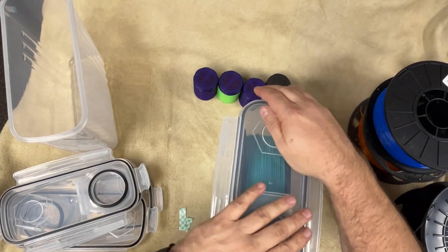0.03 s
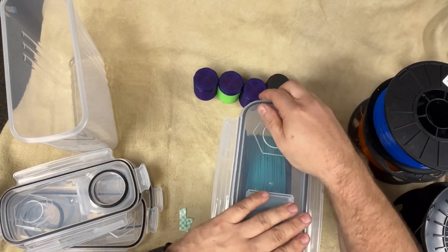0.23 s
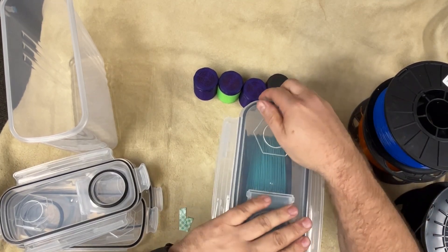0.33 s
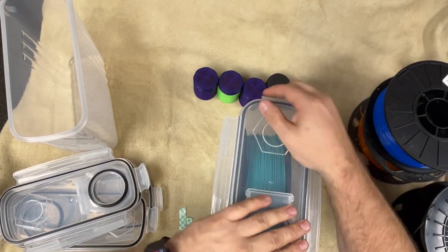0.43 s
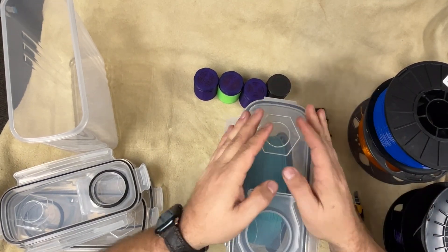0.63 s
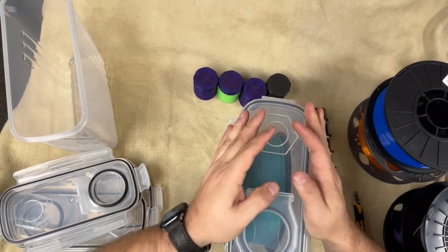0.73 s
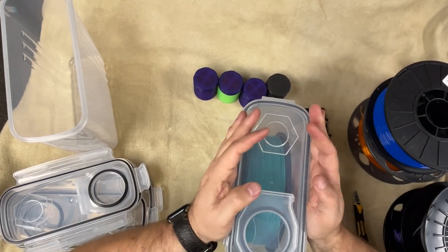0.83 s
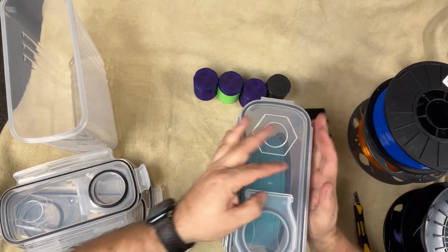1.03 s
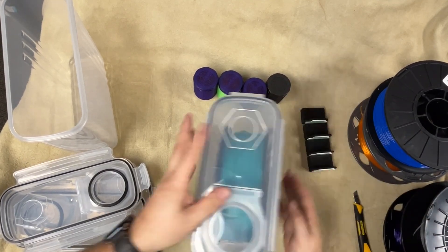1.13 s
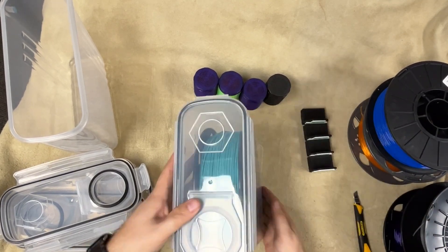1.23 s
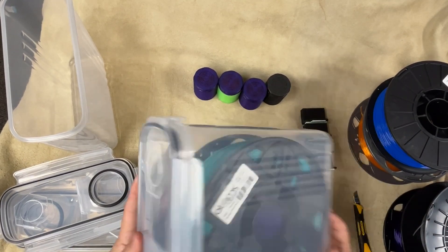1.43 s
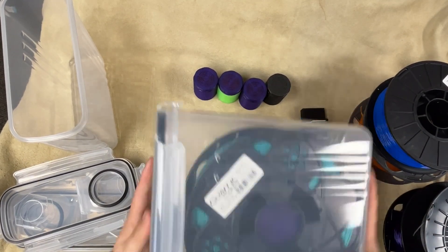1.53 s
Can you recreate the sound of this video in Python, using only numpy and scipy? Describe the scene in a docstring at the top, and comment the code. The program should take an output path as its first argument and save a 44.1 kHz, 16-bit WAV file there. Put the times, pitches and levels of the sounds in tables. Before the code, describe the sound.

Latches on a hollow plastic box snap shut: one loud crack early, a quick double clack midway, then softer knocks, with light handling ticks and brushing hands, close stereo microphone in a small quiet room.

```python
"""On a cloth-covered table, close under a stereo microphone, hands press the latch flaps of a plastic box shut.
Each snap is a short rattling push that sets the hollow box, its lid, the flap and its thin edge ringing.
Small handling ticks ring the same parts; a few squeaks are gliding tones, and the brushing hands are noise.
Wavering hum tones and airy room noise run throughout, and the snaps and ticks leave a short room echo."""
import sys
import numpy as np
from scipy import signal
from scipy.fft import rfft, irfft, next_fast_len
from scipy.io import wavfile
from scipy.ndimage import uniform_filter1d

SR = 44100
rng = np.random.default_rng(int(sys.argv[2]) if len(sys.argv) > 2 else 0)


def dump_mix(stems):
    """Bounce the given channels to the path in sys.argv[1] as a 16-bit WAV at rate SR."""
    frames = np.atleast_2d(stems).T  # one column per channel
    limited = np.clip(frames, -1, 1)  # hard clip at full scale
    pcm = np.round(limited * 32767).astype(np.int16)
    wavfile.write(sys.argv[1], SR, pcm)


N = 70560   # samples, 1.6 s

# background noise of the room, relative: pitch_hz, level_db per Hz
AIR_COLOUR = [(18, -84), (30, -66), (75, -7.5), (149, -10.5), (184, -19.5), (336, -12.5), (384, -15),
              (600, -13.5), (1220, -28), (1460, -25), (1630, -25.5), (2610, -31.5), (2980, -31),
              (12000, -51.5), (16000, -65)]
# tones of the hum: pitch_hz, level_db (rms, around which it wavers)
HUM_TONES = [(88, -56), (180, -59.5), (395, -60.5), (510, -64.5)]
# how loud the hands brush plastic and cloth: time_s, level_db
RUSTLE_LEVELS = [(0, -67.5), (.07, -55), (.13, -66), (.165, -66.5), (0.211, -52), (.4, -71), (.47, -57.5),
                 (.54, -71), (.6, -58.5), (.66, -67.5), (.76, -61.5), (.93, -60.5), (1.031, -50),
                 (1.08, -64), (1.16, -60.5), (1.35, -68), (1.48, -62.5), (1.6, -58)]
# colour of that brushing, relative: pitch_hz, level_db per Hz
RUSTLE_COLOUR = [(300, 13), (1000, 15), (3000, 1), (6000, 4), (8500, -17), (11000, -11), (14000, -8)]
# how alike both sides of the noise are: pitch_hz, likeness (0 to 1)
LIKENESS = [(60, 0.93), (350, 0.99), (690, 0.54), (1030, 0.043), (3000, 0.18), (6000, 1), (8500, 1),
            (15000, 1)]
# latch snaps and knocks: start_s, thump_db, thump_centre_hz, lid_db, lid_centre_hz,
# crack_db, crack_centre_hz, treble_db
SNAPS = [(0.2354, -22, 310, -8.5, 860, -10, 4504, -23.5),
         (0.2388, -11.5, 272.4, -16.5, 640, -17, 4930, -55), (0.2452, -7, 55, -22, 640, -53, 2170, -57),
         (.800, -37, 265, -35.5, 783, -45, 2700, -79), (0.807, -30, 288, -37, 783, -25, 3260, -54.5),
         (0.8077, -15, 260, -14, 479, -35, 2950, -51), (0.822, -18, 274, -14, 1400, -17, 4290, -32.5),
         (0.8457, -35, 259, -12.5, 1300, -12.5, 2237, -18.5),
         (0.8495, -36.5, 256, -24.5, 666, -24.5, 2410, -40),
         (0.8555, -34, 256, -38.5, 926, -24.5, 2800, -31.5),
         (1.2221, -28.5, 253, -34.5, 506, -64, 1950, -74), (1.2394, -14.5, 310, -17.5, 663, -32, 3100, -49),
         (1.2605, -40.5, 320, -36.5, 684, -44, 2930, -63), (1.5276, -23.5, 140, -30, 780, -33, 2260, -56),
         (1.571, -33, 340, -42.5, 505, -71, 2000, -87.5), (1.593, -28, 183, -42.5, 634, -45.5, 1530, -64)]
# small ticks of handling: same columns as the snaps
TICKS = [(0.051, -42, 282, -37.5, 635, -39, 1870, -65.5), (0.1728, -35, 310, -39.5, 790, -32.5, 2090, -82),
         (0.1915, -34, 305, -34, 650, -40, 2840, -83), (.439, -37.5, 303, -41.5, 600, -45, 2040, -75),
         (0.467, -49, 265, -48.5, 595, -50.5, 3100, -67), (.563, -80, 270, -71, 606, -48, 6750, -53),
         (0.587, -35, 330, -46, 604, -45, 1900, -58), (0.748, -45.5, 270, -72, 620, -41.5, 3240, -89),
         (.759, -39.5, 277, -48, 585, -52, 2220, -86), (0.783, -59, 276, -38, 790, -49.5, 1600, -81),
         (0.994, -37.5, 301, -44.5, 780, -51, 1510, -72), (1.042, -36, 230, -50, 600, -34, 2100, -77),
         (1.45, -46, 270, -71, 600, -44.5, 2140, -68), (1.477, -42, 200, -46.5, 704, -50.5, 1490, -81),
         (1.507, -36, 202, -56, 597, -48, 2830, -73)]
# ringing of the table, air and walls of the box: pitch_hz, level_db, t60_s (time to fall 60 dB)
HOLLOW_MODES = [(44.7, -22, 0.1), (90, -11.5, .06), (140, -2.5, 0.051), (185.3, 1, 0.044),
                (249.1, 1, 0.077), (274.7, -1.5, 0.089), (330.1, 2.5, 0.03), (415, 4.5, 0.033)]
# ringing of the lid: pitch_hz, level_db, t60_s
LID_MODES = [(500.3, 3, 0.027), (585, 0, 0.017), (654.8, 5.5, 0.026), (747, 1, .014), (860, 1.5, 0.013),
             (947, 1.5, 0.015), (1036, 5, 0.0092), (1173, 2, 0.006), (1398, 3.5, 0.014)]
# ringing of the latch flap: pitch_hz, level_db
FLAP_MODES = [(1600, 7.5), (1850, 0.5), (2250, 3), (2700, 2), (3100, 10), (3700, 4), (4300, 9), (4750, 9.5),
              (5500, 8), (6200, 11), (7300, 2)]
# ringing of the flap's thin edge: pitch_hz, level_db
EDGE_MODES = [(9800, 3), (10800, 14.5), (12000, -1), (13200, -6), (14800, -12)]
# the next four tables hold one value each for hollow box, lid, flap, edge
# wait before the part is pushed: delay_s
PART_DELAYS = [0.00062, 0.00057, 0.0015, 0.0007]
# how quickly the push dies away: decay_s
CONTACT_DECAYS = [0.0033, 0.0014, 0.0013, 0.0013]
# change of a mode's share away from the contact's centre (positive falls, negative rises):
# slope_db per octave
SHARE_SLOPES = [17, 9, 2.5, -2.5]
# noise in the push, against a smooth wave of height 1: noise_ratio
RATTLE = [1, 3, 2.5, 4]
# a finger slides squeaking over the lid: start_s, length_s, start_hz, end_hz, level_db
SQUEAKS = [(.151, .021, 2400, 1500, -50), (.157, .02, 3200, 1800, -51), (.147, .02, 1300, 1000, -50),
           (.067, .012, 2700, 3400, -54)]
# how the right port hears against the left: pitch_hz, level_db, phase_rad
RIGHT_PORT = [(0, -1, 0.5), (170, 2, -0.07), (640, 4.5, 0.69), (1020, 9, 0.66), (1400, 1, 0.88),
              (3100, -1.5, -1.5), (4900, 3.5, -2), (7510, 3.5, -1.5), (9100, -1.5, -3), (9600, -0.5, -4.5),
              (11400, 2, -5), (12000, -2, -5), (14900, 3, -9.5)]

AIR_DB, LOW_CUT_HZ = -51.5, 64   # air level before the low cut; the cut is for air and rustle
HUM_WAVER_DB, HUM_WAVER_SHARE = 4, .04   # spread of level, and of pitch as a share
LATE_CYCLES, LATEST_S = .75, 0.00399   # box and lid: the lower a mode, the later it speaks
CONTACT_RISE_S = 0.00018
TICK_SLOPE_DB_PER_OCT = 13.5   # light contacts pick out the flap's modes more narrowly
FLAP_CYCLES = 8   # flap and edge modes fall 60 dB in this many cycles
PEAK_DB, PEAK_OCT = 6.5, 0.074   # the flap mode right at the centre stands out
HIT_LOW_CUT_HZ = 76
ROOM_T60_S, ROOM_DB, ROOM_LOW_CUT_HZ = 0.1, -8.5, 170
ROOM_SMOOTH_HZ = 30000   # above hearing: the echo stays nearly as bright as the hits
ROOM_WIDTH = 1   # share of unlike reflections
CEILING, CUTOFF_HZ = 1.5, 16500   # largest height after rounding; top of the sound


def from_db(db):
    """Turn decibels into a plain multiplier."""
    return 10 ** (np.asarray(db) / 20)


def rms_one(x):
    """Scale to an rms (average strength) of 1."""
    return x / np.sqrt(np.mean(x ** 2) + 1e-20)


def at_hz(points, hz):
    """Read a table between its points, on a logarithmic pitch scale."""
    points = np.array(points)
    return np.interp(np.log(hz), np.log(np.maximum(points[:, 0], 1)), points[:, 1])


def high_pass(x, order, hz):
    """Weaken what lies below hz, more steeply for a higher order."""
    return signal.sosfilt(signal.butter(order, hz, "high", fs=SR, output="sos"), x)


def drift(rate_hz):
    """Slow random wandering of rms 1: smoothed noise, made at every 40th sample."""
    r = np.exp(-80 * np.pi * rate_hz / SR)
    noise = rng.standard_normal(N // 40 + 2002)
    slow = signal.lfilter([1], [1, -2 * r, r * r], noise)[2000:]   # drop the filter's start-up
    return np.interp(np.arange(N) / 40, np.arange(len(slow)), rms_one(slow))


def banded_noise(spectrum, patchy_db):
    """Third-octave bands of stereo noise, each with its own level, flicker and likeness; rms 1."""
    out = 0
    edges_hz = 30 * 2 ** np.arange(0, 9.2, 1 / 3)
    white = rng.standard_normal((2, 2, N))   # neighbouring bands use different noise
    for k, (low, high) in enumerate(zip(edges_hz, edges_hz[1:])):
        band = signal.butter(2, [low, high], "band", fs=SR, output="sos")
        mid, side = signal.sosfilt(band, white[k % 2])
        hz = np.sqrt(low * high)
        alike = np.clip(at_hz(LIKENESS, hz), 0, 1)
        level = from_db(at_hz(spectrum, hz) + patchy_db * drift(4.2))
        stereo = np.sqrt(1 + alike) * mid + np.sqrt(1 - alike) * side * [[1], [-1]]
        out = out + level * stereo
    return rms_one(out)


def room_air():
    """Airy background noise, coloured by band and flickering slightly."""
    return from_db(AIR_DB) * banded_noise(AIR_COLOUR, patchy_db=1.5)


def hum():
    """Tones of a distant appliance: sines wavering in level and pitch."""
    out = np.zeros(N)
    for hz, db in HUM_TONES:
        level = from_db(db + HUM_WAVER_DB * drift(8.9)) * np.sqrt(2)   # rms to height
        turns = hz * np.cumsum(1 + HUM_WAVER_SHARE * drift(5.24)) / SR
        out += level * np.sin(2 * np.pi * turns)
    return out


def rustle():
    """Hands brushing plastic and cloth: patchy noise that swells and fades."""
    s, db = np.transpose(RUSTLE_LEVELS)
    level = from_db(np.interp(np.arange(N) / SR, s, db))
    return level * banded_noise(RUSTLE_COLOUR, patchy_db=3.5)


def ring(x, hz, t60):
    """One mode: a unit click sets a dying sine of starting height 1 ringing."""
    r, w = from_db(-60 / (t60 * SR)), 2 * np.pi * hz / SR
    return signal.lfilter([0, np.sin(w)], [1, -2 * r * np.cos(w), r * r], x + 1e-18)


def box():
    """Every snap or tick pushes each part briefly; a mode's distance from the centre pitch sets its share."""
    out = np.zeros(N)
    rows = np.array(SNAPS + TICKS)
    is_tick = np.arange(len(rows)) >= len(SNAPS)
    t = np.arange(400) / SR
    flap, edge = [[(hz, db, FLAP_CYCLES / hz) for hz, db in part] for part in (FLAP_MODES, EDGE_MODES)]
    for part, modes in enumerate([HOLLOW_MODES, LID_MODES, flap, edge]):
        is_flap = part == 2
        level_db = rows[:, 1 + 2 * part]
        centre_hz = rows[:, min(2 + 2 * part, 6)]   # the edge shares the crack's centre
        fade = np.exp(-t / CONTACT_DECAYS[part]) * (1 - np.exp(-t / CONTACT_RISE_S))
        starts = ((rows[:, 0] + max(PART_DELAYS[part], 0)) * SR).astype(int)
        slope = np.where(is_tick & is_flap, TICK_SLOPE_DB_PER_OCT, SHARE_SLOPES[part])
        for hz, db, t60 in modes:
            drive = np.zeros(N + 1000)
            chance = rng.standard_normal((len(rows), len(t) + 1))
            octaves_off = np.abs(np.log2(hz / centre_hz))
            peak_db = is_flap * PEAK_DB * np.exp(-(octaves_off / PEAK_OCT) ** 2)
            gains = from_db(level_db + db - slope * octaves_off + peak_db)
            late = int((part < 2) * min(LATE_CYCLES / hz, LATEST_S) * SR)
            for i, gain, noise in zip(starts + late, gains, chance):
                phase = (part > 1) * 10 * noise[0]   # random for flap and edge only
                push = np.cos(2 * np.pi * hz * t + phase) + RATTLE[part] * noise[1:]
                drive[i:i + len(t)] += gain * 2 * fade * push / fade.sum()
            out += ring(drive[:N], hz, t60)
    return high_pass(out, 2, HIT_LOW_CUT_HZ)


def squeaks():
    """Stick-slip of a sliding finger: short gliding sines, rough in level."""
    out = np.zeros(N)
    for s, length, hz0, hz1, db in SQUEAKS:
        n, i = int(length * SR), int(s * SR)
        turns = np.cumsum(np.linspace(hz0, hz1, n)) / SR
        out[i:i + n] += from_db(db) * np.hanning(n) * np.sin(2 * np.pi * turns)
    roughness = rms_one(uniform_filter1d(rng.standard_normal(N), size=40))
    return out * (1 + .25 * roughness)


def room(x):
    """Dense diffuse reflections: a dying noise for each side, nearly as bright as the hits, lows thinned."""
    t = np.arange(int(.4 * SR)) / SR
    fade = from_db(-60 * t / ROOM_T60_S) * (1 - np.exp(-t / .002))
    mid, side = rng.standard_normal((2, len(t))) * fade
    smooth = np.exp(-2 * np.pi * ROOM_SMOOTH_HZ / SR)
    sides = [mid + ROOM_WIDTH * side, mid - ROOM_WIDTH * side]
    tail = signal.lfilter([1 - smooth], [1, -smooth], sides)
    tail = high_pass(tail, 1, ROOM_LOW_CUT_HZ)
    tail = tail / np.sqrt(np.sum(tail ** 2) / 2)   # average energy 1 a side
    return signal.fftconvolve(x[None], tail, axes=1)[:, :N]


def ports(stereo):
    """Two ports in one housing: level and phase differ by frequency, shared half each."""
    size = next_fast_len(N + 2000)
    hz, db, rad = np.transpose(RIGHT_PORT)
    f = np.arange(size // 2 + 1) * SR / size
    half = from_db(np.interp(f, hz, db) / 2) * np.exp(.5j * np.interp(f, hz, rad))
    return irfft(rfft(stereo, size) * np.array([1 / half, half]), size)[:, :N]


def scene():
    """Add all sounds together and pass them through the two ports."""
    hits = box()
    steady = high_pass(rustle() + room_air(), 4, LOW_CUT_HZ)
    sources = hits + squeaks() + steady + hum()
    echo = from_db(ROOM_DB) * room(hits)
    return ports(sources + echo)


def record(dry):
    """Round the peaks softly, then cut the top of the sound."""
    rounded = CEILING * np.tanh(dry / CEILING)
    return signal.sosfilt(signal.cheby2(14, 70, CUTOFF_HZ, fs=SR, output="sos"), rounded)


dry = scene()
out = record(dry)
dump_mix(out)
```